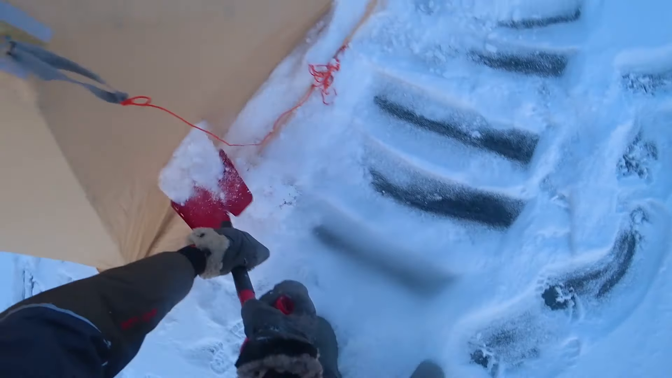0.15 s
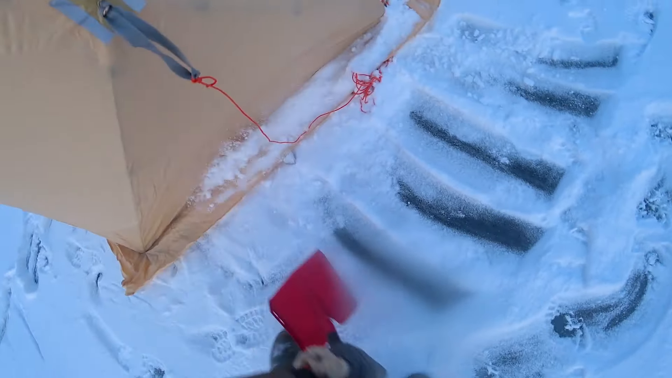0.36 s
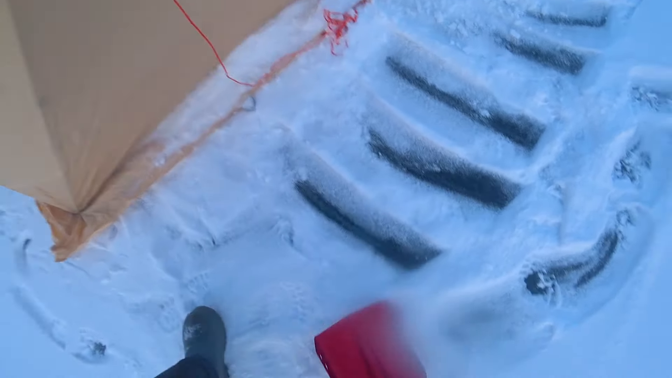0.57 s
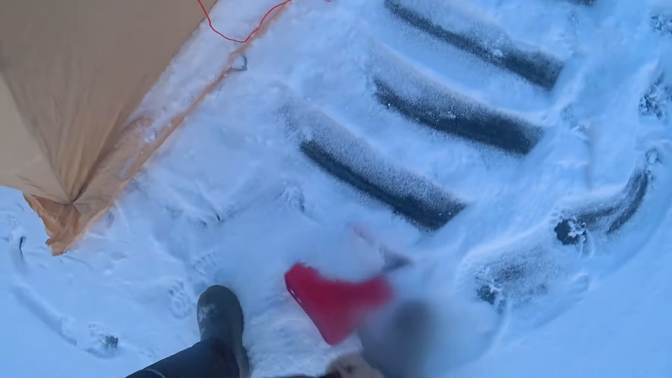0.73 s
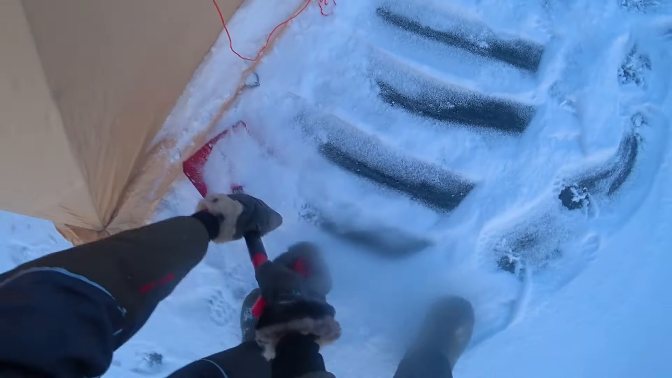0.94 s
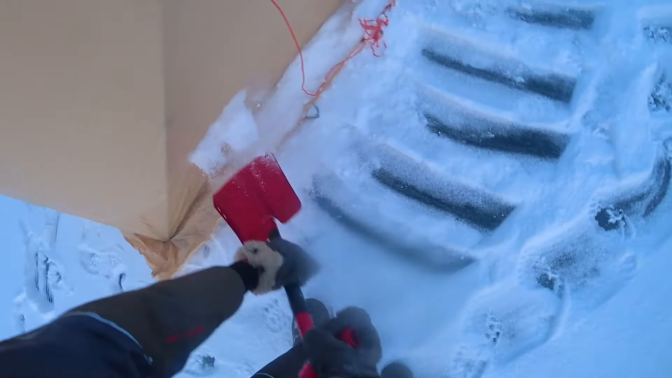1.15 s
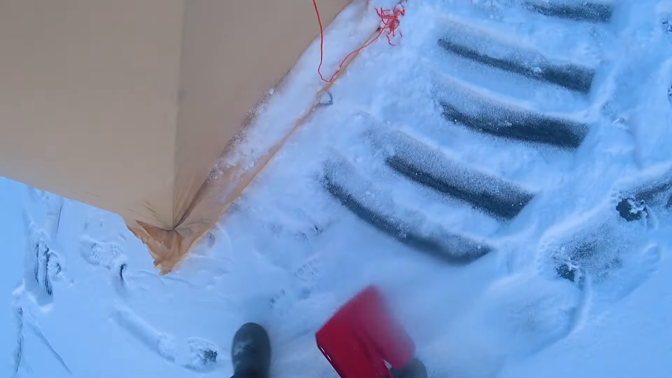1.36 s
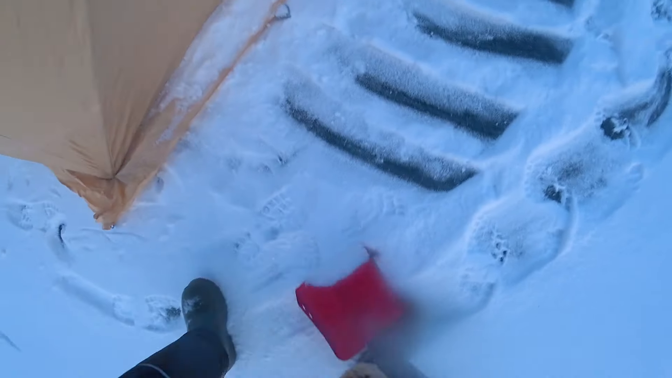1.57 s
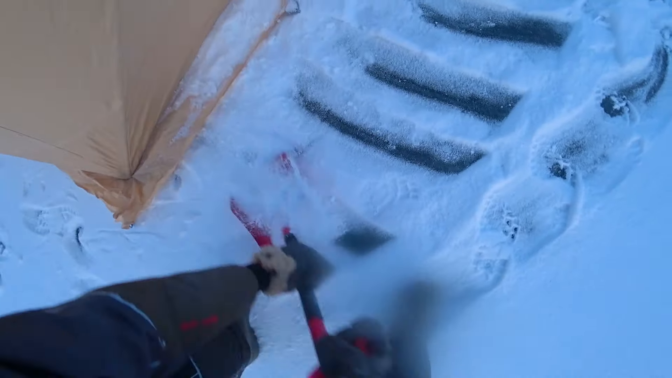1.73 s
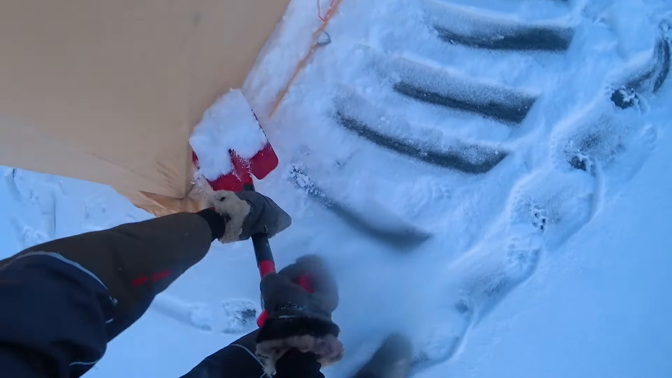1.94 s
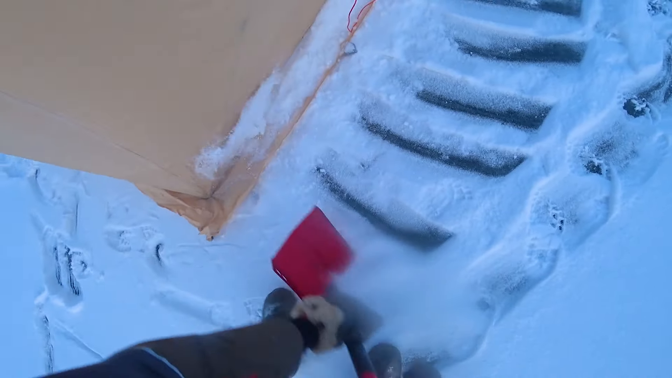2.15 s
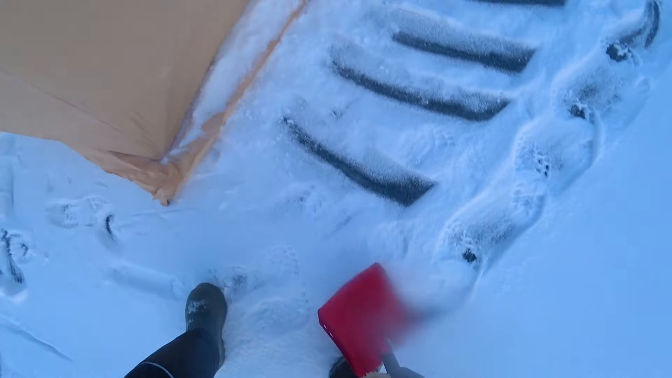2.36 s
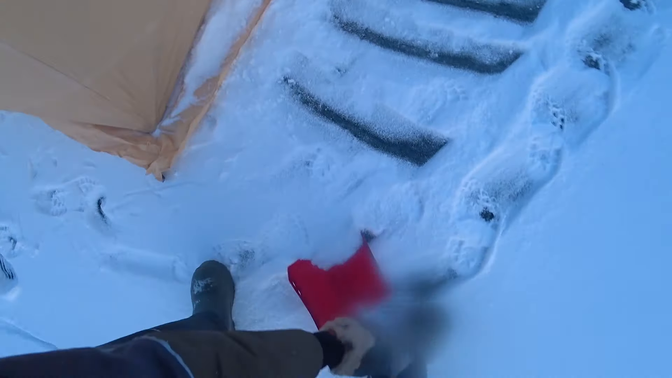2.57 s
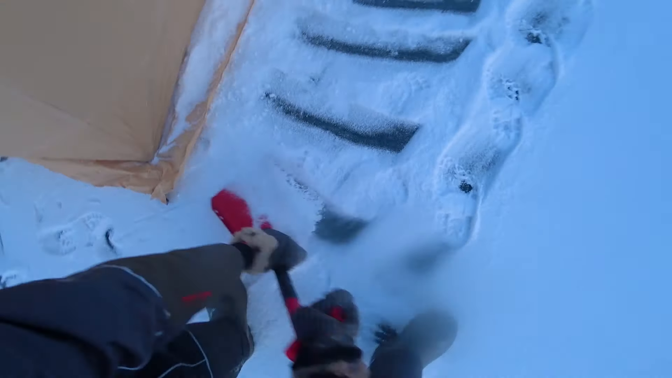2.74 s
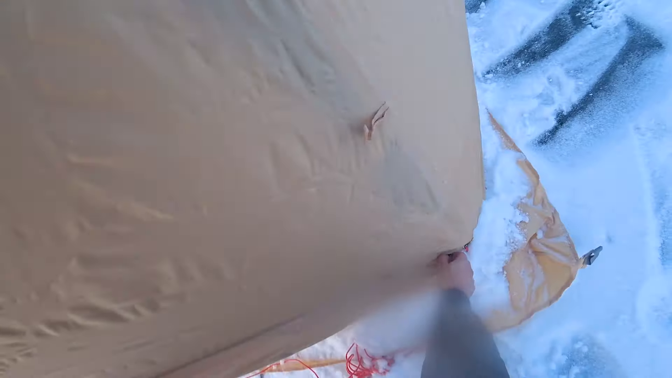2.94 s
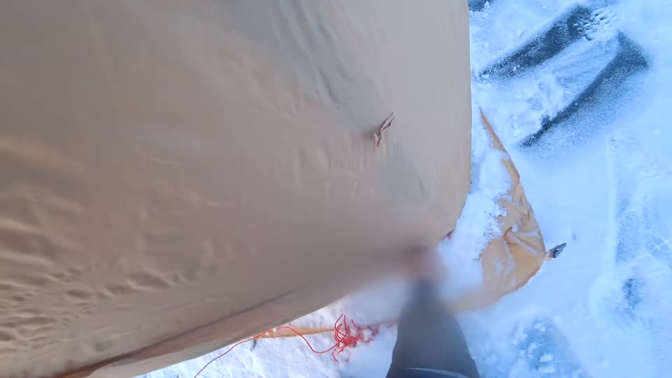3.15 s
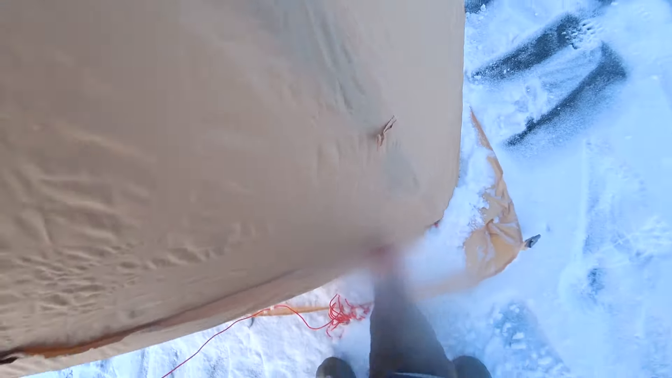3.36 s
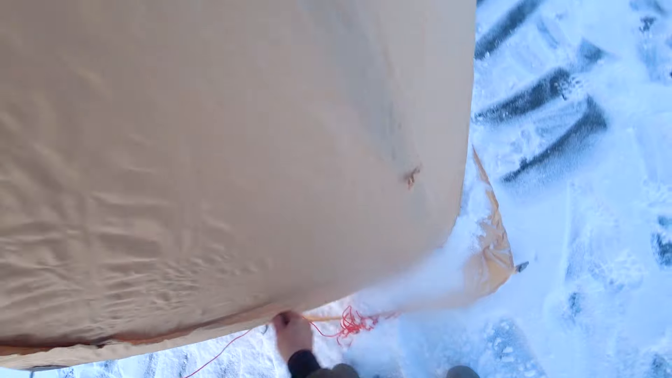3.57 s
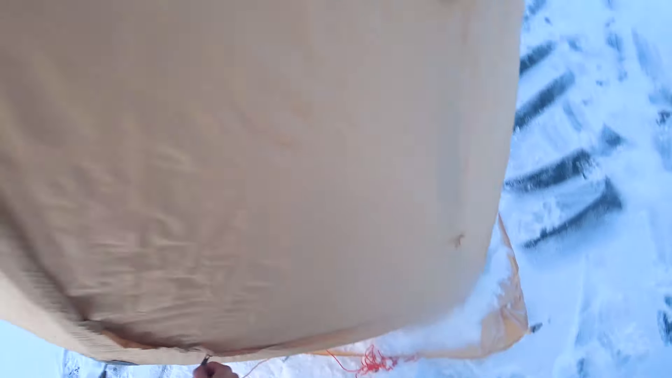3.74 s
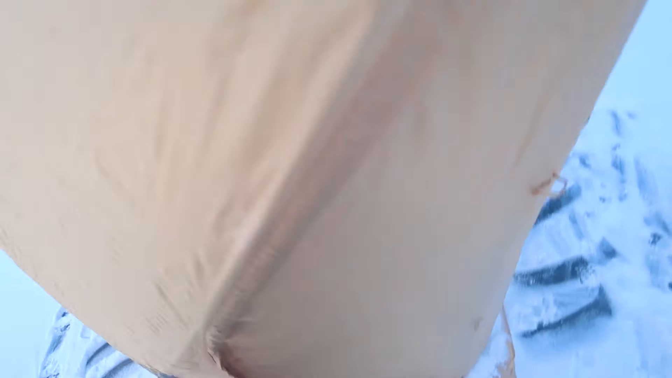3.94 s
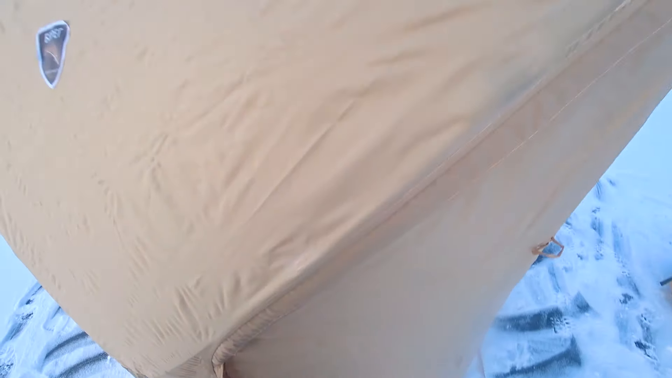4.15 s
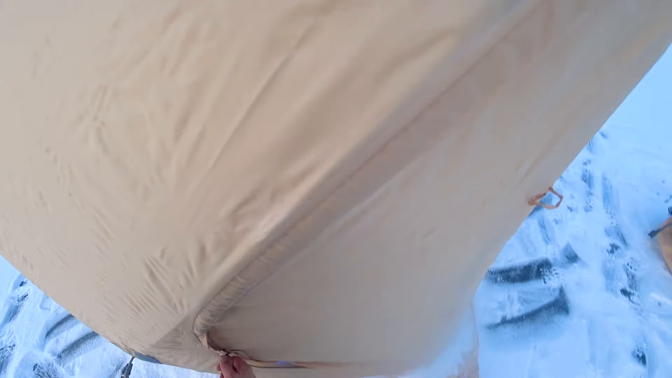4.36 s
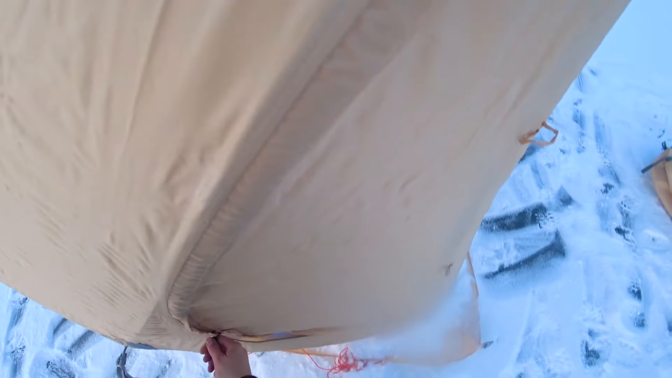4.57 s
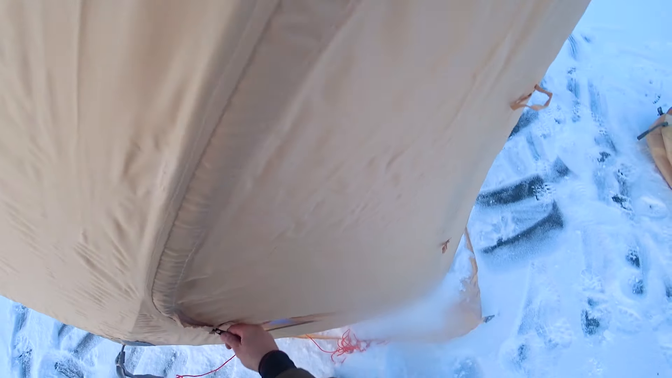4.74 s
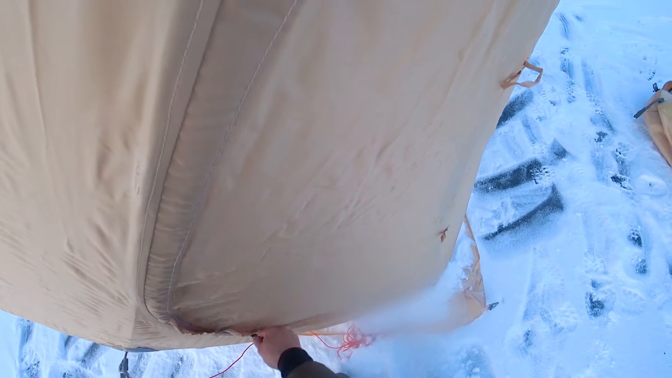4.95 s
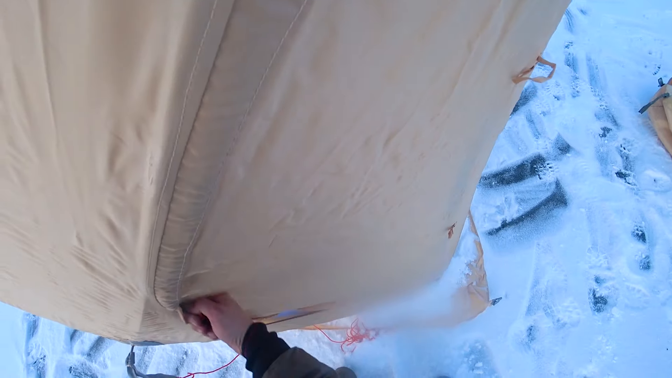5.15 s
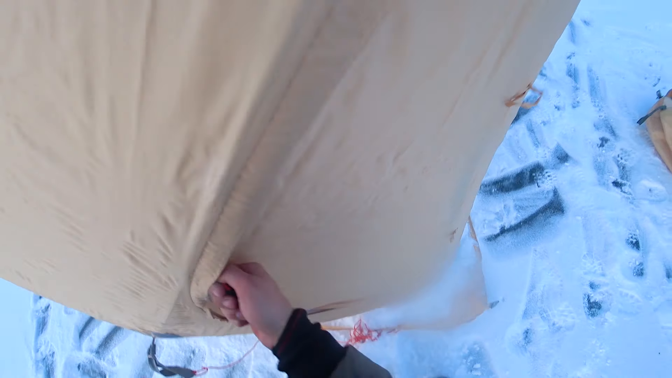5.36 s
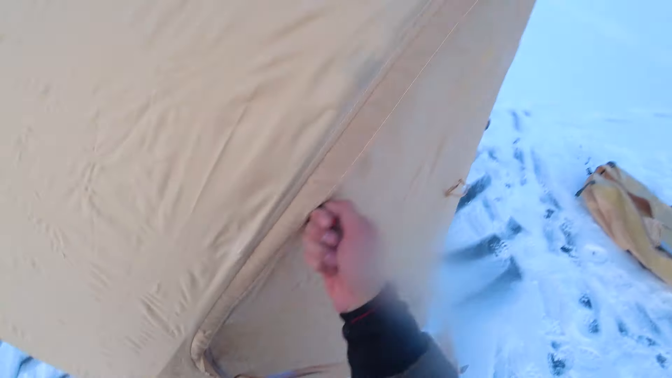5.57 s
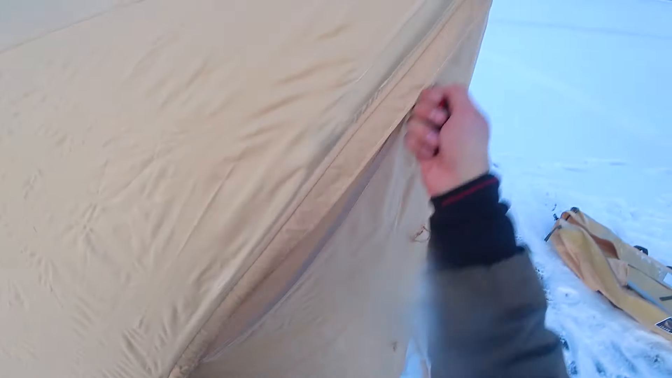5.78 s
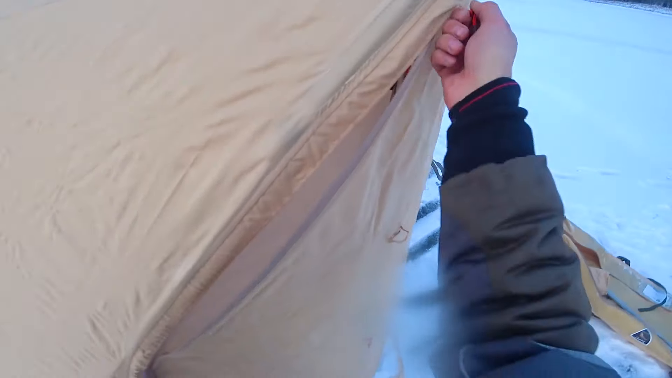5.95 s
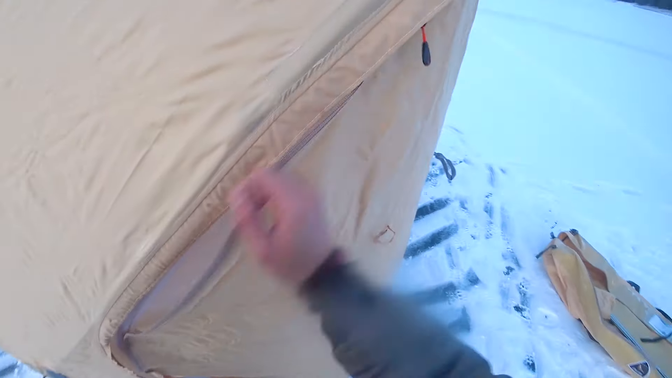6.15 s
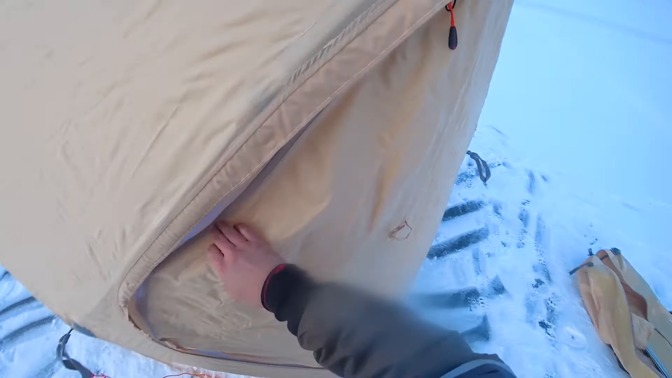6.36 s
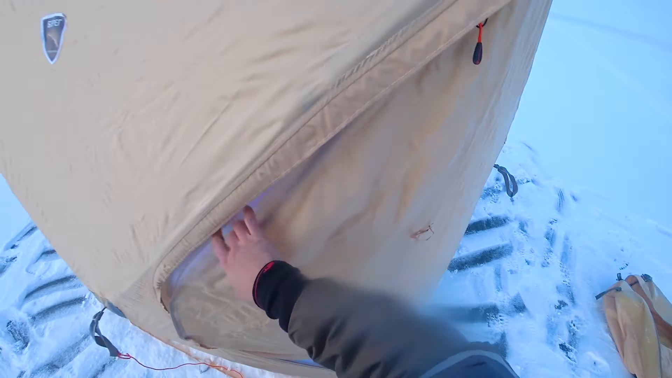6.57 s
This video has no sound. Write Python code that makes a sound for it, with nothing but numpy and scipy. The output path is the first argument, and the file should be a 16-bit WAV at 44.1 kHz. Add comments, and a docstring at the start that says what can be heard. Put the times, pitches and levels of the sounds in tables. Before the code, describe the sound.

Close, dry outdoor stereo sound with light, low wind buffeting the microphone. At 0 s the loud end of a shovel push cuts off, followed by cloth rustle and snow crunch. Grainy, hissing scrapes with a ringing blade come at about 0.7-1.0, 1.55-1.85 and 2.45-2.85 s, with dull knocks around them and a hard crack near 2.48. From 3.15 to 3.9 s a tent zip buzzes, starting slow and rough, rising in pitch to a fast whirr, then dropping; a sharp snap lands at 3.33. Cloth clicks cluster around 4.0, then it is quieter, with faint rustling and wind thumps near 4.7. A brief zip tug at 4.85-5.0 leads to pulls at 5.05-5.4 and 5.43-6.0, with bright tab jingles and snaps. From 6.0 to 6.6 only fabric rustle, scattered small snaps and wind remain.

```python
"""Beside a tent in dry snow, a shovel ends one push and makes three more; then the tent's zip opens in four strokes.
The shovel is a stream of tiny snow-grain noises that also makes the blade ring. The zip is a buzz of jolts from
its teeth with a hiss from the slider, and its metal pull tab jingles as short fading sines. Cloth and snow rustle
as filtered noise, snaps and knocks are brief tones with a crack, and light wind is low noise at the microphone."""
import sys
import numpy as np
from scipy import signal
from scipy.fft import rfft, irfft, next_fast_len
from scipy.io import wavfile

SR = 44100
rng = np.random.default_rng(int(sys.argv[2]) if len(sys.argv) > 2 else 0)


def bounce(signal):
    """Save signal as a 16-bit WAV file at the path given by the first command-line argument."""
    frames = np.transpose(np.atleast_2d(signal))
    limited = np.clip(frames, -1, 1)
    pcm = np.round(limited * 32767).astype(np.int16)
    wavfile.write(sys.argv[1], SR, pcm)


N = 291501  # length of the scene [samples]


def from_db(db):
    """Turn decibels into a gain."""
    return 10 ** (np.asarray(db) / 20)


def rms_one(x):
    """Scale a sound to an average (rms) strength of 1."""
    return x / np.sqrt(np.mean(x ** 2) + 1e-20)


def in_time(rows):
    """Draw each column of a table as a line through time, sample by sample."""
    times, *columns = np.transpose(rows)
    return [np.interp(np.arange(N) / SR, times, column) for column in columns]


def strokes(tables):
    """Join several tables in time, with a gate that fades to silence within 15 ms outside each."""
    t = np.arange(N) / SR
    gate = 0
    for rows in tables:
        start, end = rows[0][0], rows[-1][0]
        gate = gate + np.interp(t, [start - .015, start, end, end + .015], [0, 1, 1, 0])
    return [gate] + in_time(np.vstack(tables))


def per_stroke(tables, first, last):
    """Let a value run from first to last along each table."""
    rows = []
    for table, start_value, end_value in zip(tables, first, last):
        rows += [(table[0][0], start_value), (table[-1][0], end_value)]
    return in_time(rows)[0]


def shape(x, points, kind=from_db):
    """Filter by a (frequency [Hz], value) table, read on a log frequency axis."""
    size = next_fast_len(N)
    hz = np.maximum(np.fft.rfftfreq(size, 1 / SR), 1)
    table_hz, values = np.array(points)[:, 0], np.array(points)[:, 1]
    response = kind(np.interp(np.log(hz), np.log(table_hz), values))
    return irfft(rfft(x, size) * response, size)[:N]


def band(x, low_hz, high_hz):
    """Keep one band of frequencies and scale it to rms 1."""
    sos = signal.butter(2, [low_hz, high_hz], "band", fs=SR, output="sos")
    return rms_one(signal.sosfilt(sos, x))


def drift(rate):
    """Make a random wander of rms 1; a higher rate [Hz] wanders faster."""
    r = np.exp(-2 * np.pi * rate / SR)
    noise = rng.standard_normal(N + SR)
    return rms_one(signal.lfilter([1], [1, -2 * r, r * r], noise)[SR:])  # skip the start-up second


def grains(spread_db, clump_db, clump_rate):
    """Make a dense stream of tiny breaks of uneven size, coming in clumps."""
    sizes_db = spread_db * np.minimum(rng.exponential(1, N), 6) + clump_db * drift(clump_rate)
    return rms_one(from_db(sizes_db) * rng.standard_normal(N))


def ring(clicks, hz, t60):
    """Let each click start a fading sine, 60 dB weaker after t60 seconds."""
    r, w = from_db(-60 / (t60 * SR)), 2 * np.pi * hz / SR
    return signal.lfilter([0, np.sin(w)], [1, -2 * r * np.cos(w), r * r], clicks + 1e-18)


def patchy(x, patch_db, rate, centre_hz=None, lift_db=0):
    """Let sixth-octave bands swell separately; a moving resonance may lift those near it."""
    out = 0
    edges = 150 * 2 ** np.arange(0, 7, 1 / 6)
    swells = [drift(rate) for _ in range(7)]
    for k, (low, high) in enumerate(zip(edges, edges[1:])):
        db = patch_db * np.roll(swells[k % 7], 9973 * k)  # reuse seven wanders, shifted in time
        if centre_hz is not None:
            db = db + lift_db * np.exp(-(np.log(centre_hz / low) / 0.66) ** 2)
        sos = signal.butter(2, [low, high], "band", fs=SR, output="sos")
        out = out + from_db(db) * signal.sosfilt(sos, x) * (-1) ** k
    return out


def blows(events, crack_s):
    """Let each blow ring briefly at its pitch, with a broad crack that fades 60 dB in crack_s."""
    out, t = np.zeros(N + SR), np.arange(6000) / SR
    noises = rng.standard_normal((len(events), len(t)))
    for (s, db, hz, t60, crack_db), noise in zip(events, noises):
        body = np.sin(2 * np.pi * hz * t) * from_db(-60 * t / t60)
        crack = from_db(crack_db - 60 * t / crack_s) * signal.lfilter([.35], [1, -.9, .25], noise)
        at = round(s * SR)
        out[at:at + len(t)] += from_db(db) * (body + crack)
    return out[:N]


def wind():
    """Air pressure pushes unevenly on the microphone: a deep rumble with a lighter flutter above."""
    # Wind strength before its random wander: (time [s], rumble level [dB], flutter level [dB])
    gusts = [(0.0, -57, -43), (0.09, -50, -48.5), (1.91, -63, -48), (2.87, -56, -47), (3.05, -50, -45),
             (3.33, -54, -34), (3.41, -49, -41), (3.87, -42.5, -41.5), (4.57, -45.5, -56),
             (4.66, -28.5, -52), (4.73, -44, -52), (4.82, -37, -29.5), (5.12, -42, -44), (5.19, -41, -33),
             (5.26, -44, -39), (5.39, -31, -31.5), (5.49, -45, -40.5), (5.87, -36, -33.5),
             (6.06, -43, -44.5), (6.41, -34, -39), (6.61, -46, -42)]
    rumble_db, flutter_db = in_time(gusts)
    rumble = band(band(rng.standard_normal(N), 22, 58), 18, 75)
    flutter = band(band(rng.standard_normal(N), 84, 262), 59, 380)
    return rumble * from_db(rumble_db + 1.5 * drift(4)) + flutter * from_db(flutter_db + 3.0 * drift(8))


def rustle():
    """Stiff cloth crackles brightly while snow crunches lower down, both as uneven grain noise."""
    # Cloth and snow moving, one table a pause: (time [s], crackle level [dB])
    pauses = [
        [(0.04, -25), (0.112, -37), (0.138, -27.5), (0.286, -28), (0.346, -24), (0.482, -29.5), (0.516, -21),
         (0.574, -36), (0.66, -25.5)],
        [(0.99, -32), (1.042, -33.5), (1.092, -30), (1.124, -33), (1.154, -26), (1.42, -33), (1.432, -26.5),
         (1.51, -32), (1.54, -15)],
        [(1.89, -26.5), (1.902, -34), (2.018, -33.5), (2.038, -26), (2.084, -26), (2.108, -29), (2.144, -28),
         (2.45, -31), (2.46, -24)],
        [(2.85, -32), (2.878, -31.5), (2.9, -23), (2.972, -40), (3.082, -47.5), (3.09, -35.5), (3.116, -43),
         (3.128, -37.5), (3.16, -36.5)],
        [(3.9, -30.5), (3.928, -31), (3.932, -42), (3.998, -32.5), (4.008, -27.5), (4.056, -43), (4.092, -40),
         (4.16, -48.5), (4.2, -43.5)],
        [(4.215, -46.5), (4.485, -47.5), (4.495, -34.5), (4.521, -51), (4.695, -50), (4.705, -41), (4.723, -44),
         (4.865, -32.5), (4.87, -14.5)],
        [(4.98, -29), (5.002, -41), (5.046, -35), (5.058, -38), (5.07, -27.5)],
        [(5.98, -31), (6.016, -48), (6.07, -37.5), (6.092, -44.5), (6.134, -31.5), (6.49, -37), (6.55, -49),
         (6.56, -42), (6.61, -40.5)],
    ]
    # Tone colour of the cloth: (frequency [Hz], gain [dB])
    cloth_colour = [(290, -10.5), (500, -25), (784, -7), (1210, 0), (2130, -3), (5550, -1), (11100, -12.5),
                    (15100, -18), (16000, -21)]
    # Low crunch, one value a pause: (level above the crackle [dB])
    crunch_levels = [-9, -6, -4.5, -1, -1.5, -3.5, -9, 2.5]
    gate, rustle_db = strokes(pauses)
    cloth_grains = grains(spread_db=1.5, clump_db=2.0, clump_rate=34)
    crackle = rms_one(shape(patchy(cloth_grains, patch_db=2.5, rate=15), cloth_colour))
    crunch = band(grains(spread_db=5.0, clump_db=3.5, clump_rate=33), 305, 1024)
    crunch_db = per_stroke(pauses, crunch_levels, crunch_levels)
    return gate * from_db(rustle_db) * (crackle + from_db(crunch_db) * crunch)


def snaps():
    """Frozen cloth snaps sharply, and dull knocks ring lower; each is a fading tone plus a crack."""
    # Snaps: (time [s], level [dB], pitch [Hz], crack level above the tone [dB])
    snap_events = [(0.6913, -6, 3050, -14), (1.31, -15, 4150, -3), (2.458, -14, 3240, -6),
                   (2.4779, 1, 3520, 10), (3.0902, -19.5, 4420, -1), (3.1268, -17, 4580, -6),
                   (3.2436, -18, 3150, -9), (3.3312, -2, 4330, -6), (3.95, -12.5, 4540, -2),
                   (4.007, -6, 5040, -12), (4.0164, -8, 5330, -1.5), (4.0257, -11.5, 8750, 0),
                   (4.4947, -15.5, 4300, -2), (4.706, -25.5, 3460, -4), (4.778, -27, 1570, -4),
                   (4.8246, -21, 1710, 13), (4.8712, -11.5, 1596, -13), (5.0679, -3.5, 5670, -14),
                   (5.0933, -20, 4714, -3), (5.1213, -7.5, 4796, -8), (5.3532, -5, 2700, -8),
                   (5.4325, -9, 3040, 5), (5.464, -9, 2750, 7), (5.742, -3, 2500, -10),
                   (5.796, -2, 6290, -4), (5.8083, -7, 4520, 14), (5.9184, -10, 1670, 7),
                   (6.064, -16, 8700, 0), (6.1384, -9.5, 3600, 3), (6.1522, -6, 3580, 1),
                   (6.1853, -14, 2610, 11), (6.209, -18, 1940, 3), (6.2317, -13, 4080, -8),
                   (6.29, -18, 3870, 1), (6.333, -8, 4610, 3), (6.3427, -9.5, 4630, -22),
                   (6.3966, -14.5, 3470, 7.5), (6.4184, -10, 3300, 2), (6.562, -22, 1920, -12)]
    # Dull knocks: (time [s], level [dB], pitch [Hz], time to fade by 60 dB [s])
    knock_events = [(0.641, -15, 703, .11), (0.689, -15, 472, 0.16), (1.085, -25, 377, 0.046),
                    (1.201, -22.5, 690, 0.049), (1.513, -24, 396, .06), (1.592, -10.5, 493, 0.096),
                    (1.912, -23, 428, 0.036), (2.361, -26, 396, .05), (2.398, -21.5, 369, .06),
                    (2.898, -18.5, 719, .09), (3.039, -20.5, 444, 0.025), (3.091, -19, 432, 0.033),
                    (3.127, -25, 715, .03), (4.097, -15, 493, 0.018), (4.777, -27.5, 703, .045),
                    (4.827, -19, 471, 0.056)]
    # A snap fades by 60 dB in 15 cycles of its pitch
    sharp = blows([(s, db, hz, 15 / hz, crack_db) for s, db, hz, crack_db in snap_events], crack_s=.006)
    dull = blows([row + (-32,) for row in knock_events], crack_s=.012)  # crack 32 dB below the tone
    return signal.sosfilt(signal.butter(2, 150, "high", fs=SR, output="sos"), sharp + dull)


def shovel():
    """Snow grains hiss along the blade and keep its natural tones ringing, each in fits."""
    # Pushes: (start [s], length [s], scrape level [dB], drop by the end [dB], ring above the scrape [dB])
    pushes = [(-0.3, 0.31, -5, 8, -17.5), (0.675, 0.31, -12.5, 3, -11.5), (1.523, 0.027, -24.5, -2, -27),
              (1.568, 0.285, -13.5, 1.5, -15.5), (2.461, 0.367, -14, -0.6, -12.5)]
    # Tone colour of the snow: (frequency [Hz], gain [dB])
    snow_colour = [(120, -95), (200, -28.5), (482, -8.5), (601, -11), (709, -5), (950, -11), (1560, -6),
                   (2090, -17.5), (2330, -8), (5420, -8), (16000, -26.5)]
    # Natural tones of the blade: (frequency [Hz], width [Hz], relative level before its wander [dB])
    blade_tones = [(333, 36, -36), (520, 13, -47), (691, 14, 22), (1080, 43, -30), (1246, 32, 21.5),
                   (1582, 43, 25), (2410, 59, -1), (3060, 37, -50), (4220, 140, 7), (4870, 44, -47),
                   (5100, 70, -29), (7100, 79, -19)]
    # Moments when the blade sticks: (time [s], dip [dB])
    stalls = [(2.507, 9), (2.593, 9.5)]
    attack_s, release_s, edge_db = 0.026, 0.02, -13  # swells from, and falls to, this far below its level
    freed_s, freed_db = 0.029, 11.5  # the ring rises as the blade lifts free of the snow
    stall_s = 0.005

    tables = []
    for s, length_s, db, sag_db, held_db in pushes:
        freed_ring_db = held_db + freed_db
        tables.append([
            (s, db + edge_db, held_db),
            (s + attack_s, db, held_db),
            (s + max(length_s - freed_s, attack_s), db - sag_db / 2, held_db),
            (s + length_s, db - sag_db, freed_ring_db),
            (s + length_s + release_s, db - sag_db + edge_db, freed_ring_db)])
    gate, scrape_db, ring_db = strokes(tables)
    t = np.arange(N) / SR
    for s, dip_db in stalls:
        scrape_db = scrape_db - dip_db * np.exp(-((t - s) / stall_s) ** 2)

    snow = grains(spread_db=3.0, clump_db=-0.5, clump_rate=66)
    blade = 0
    for hz, width_hz, db in blade_tones:
        tone = rms_one(ring(snow, hz, 2.2 / width_hz))  # a narrow tone rings longer
        blade = blade + from_db(db + 4 * drift(10)) * tone
    hiss = rms_one(shape(patchy(snow, patch_db=3.5, rate=12), snow_colour))
    return gate * from_db(scrape_db) * (hiss + from_db(ring_db) * rms_one(blade))


def pull_tab():
    """Each touch of the metal tab on the slider strikes all its tones, each by a random amount."""
    # Touches: (time [s], strike level [dB])
    touches = [(3.1657, -34), (3.255, -36), (3.4306, -25), (3.88, -44), (3.92, -46), (4.0068, -36),
               (4.1829, -43), (4.8479, -19.5), (4.9666, -21), (5.1202, -22), (5.1881, -25), (5.219, -27),
               (5.6939, -24), (5.8077, -24), (5.8401, -26), (5.9179, -26), (6.066, -30)]
    # Natural tones of the tab: (frequency [Hz], level added to the strike [dB], time to fade by 60 dB [s])
    tab_tones = [(8650, -4.5, 0.051), (10600, -9, 0.12), (11900, -12, 0.065), (14400, -7, 0.091)]
    at, out = [round(s * SR) for s, db in touches], np.zeros(N)
    strike_db = np.array(touches)[:, 1]
    luck = rng.standard_normal((len(at), len(tab_tones)))
    for k, (hz, level_db, t60) in enumerate(tab_tones):
        clicks = np.zeros(N)
        clicks[at] = from_db(strike_db + level_db + 2.2 * luck[:, k])
        out += ring(clicks, hz, t60)
    return out


def zip_pull():
    """One jolt a tooth makes a buzzing tone, hiss swells on every tooth, and the taut tape lifts one region."""
    # Strokes, one table each: (time [s], teeth per second [1/s], lowest tone level [dB], hiss level [dB])
    pulls = [
        [(3.14, 241.1, -58, -36), (3.198, 225.1, -33, -29.5), (3.282, 147.0, -39, -33),
         (3.338, 225.2, -30.5, -30.5), (3.42, 346.0, -21.5, -27.5), (3.458, 525, -31, -25.5),
         (3.568, 740, -18, -24.5), (3.584, 815, -25, -19.5), (3.642, 814, -28, -23.5), (3.672, 830.7, -21, -19),
         (3.72, 889.1, -21.5, -19.5), (3.766, 884, -22, -17), (3.888, 523, -32.5, -27), (3.93, 365.1, -53, -49)],
        [(4.85, 416, -51, -46), (4.888, 507, -35, -25), (4.926, 602.4, -12, -19.5), (4.94, 660, -40, -22.5),
         (4.966, 423, -30, -26.5), (4.99, 356, -34.5, -43)],
        [(5.06, 336, -46, -38), (5.106, 360, -32, -27), (5.14, 525, -22.5, -26), (5.156, 530, -18, -22.5),
         (5.164, 570, -25, -21.5), (5.2, 938.0, -29.5, -20), (5.292, 603, -16.5, -17), (5.328, 560, -26, -16.5),
         (5.38, 280.7, -31, -24), (5.41, 247.9, -42, -25)],
        [(5.43, 510, -36, -32), (5.46, 516.9, -32, -18.5), (5.518, 600, -28, -22), (5.606, 565, -21.5, -18.5),
         (5.67, 630, -23.5, -22.5), (5.694, 640, -33, -20.5), (5.788, 543, -16.5, -26),
         (5.812, 560, -31, -22.5), (5.834, 580, -15.5, -21.5), (5.9, 480, -21, -23), (5.918, 410, -28, -23.5),
         (5.99, 278.6, -38.5, -36.5)],
    ]
    # Tones of the buzz: (multiple of the tooth rate [x], level offset [dB])
    tooth_tones = [(1, 0), (2, -3), (3, -8), (4, -9), (5, -11), (6, -12), (7, -15), (8, -18)]
    # Tone colour of the slider: (frequency [Hz], gain [dB])
    slider_colour = [(88, -42), (150, -31), (475, -2.5), (790, -17.5), (1310, -9), (1720, -6), (2060, -2),
                     (3550, -4), (10600, -9), (14800, -17.5), (16000, 0)]
    # How each stroke holds the tape: (resonance at start [Hz], at end [Hz], overtones above hiss [dB],
    # low rasp above hiss at start [dB], at end [dB])
    grips = [(3700, 4000, -4, -1, -12), (4600, 5400, -4.5, -12, -9), (5000, 4200, -8.5, -6, -12),
             (3160, 4360, -6, -5.5, 1.5)]
    # Unevenness of the tooth rate at the reference speed: (at start [share, 0-1], at end [share, 0-1])
    scatter_ends = [(.018, .034), (.04, .05), (.03, .018), (.035, .09)]
    smooth_per_s, scatter_power = 550, 1.8  # reference speed [teeth/s]; faster pulls are more even
    # Over this last share of a stroke the teeth scatter more and the overtones fade
    fray_share, fray_scatter, fray_loss_db = .2, .16, 12

    gate, per_s, tone_db, hiss_db = strokes(pulls)
    start_hz, end_hz, over, rasp_start, rasp_end = np.transpose(grips)
    tape_hz = per_stroke(pulls, start_hz, end_hz)
    over_db = per_stroke(pulls, over, over)
    rasp_db = per_stroke(pulls, rasp_start, rasp_end)
    scatter = per_stroke(pulls, *np.transpose(scatter_ends))
    fray_rows = []
    for rows in pulls:
        start, end = rows[0][0], rows[-1][0]
        fray_rows += [(start, 0), (end - fray_share * (end - start), 0), (end, 1)]
    fray, = in_time(fray_rows)

    speed_scatter = scatter * (smooth_per_s / per_s) ** scatter_power
    uneven = np.minimum(fray_scatter * fray + speed_scatter, .16)
    turn = 2 * np.pi * np.cumsum(per_s * (1 + uneven * drift(100))) / SR  # one full turn a tooth
    buzz = 0
    for k, db in tooth_tones:
        lift_db = 4 * np.exp(-(np.log(k * per_s / tape_hz) / .45) ** 2)
        base_db = tone_db if k == 1 else hiss_db + over_db - fray_loss_db * np.sqrt(fray)
        wander_db = min(k + .5, 2.5) * 2 * drift(30)  # the fabric takes up each tone unevenly
        buzz = buzz + from_db(db + lift_db + base_db + wander_db) * np.sqrt(2) * np.cos(k * turn)

    rub = grains(spread_db=2.5, clump_db=1.5, clump_rate=60) * (1 + .9 * np.cos(turn))
    rasp = band(grains(spread_db=4.0, clump_db=3.5, clump_rate=75), 298, 1210)  # the tent wall drums along
    lifted_rub = patchy(rub, patch_db=2.0, rate=74, centre_hz=tape_hz, lift_db=11.5)
    hiss = rms_one(shape(lifted_rub, slider_colour))
    return gate * (buzz + from_db(hiss_db) * (hiss + from_db(rasp_db) * rasp))


def scene():
    """Both microphone ports hear everything; a restless share reaches them with opposite sign."""
    # The share that differs between the ports: (frequency [Hz], level before its wander [dB])
    unlike = [(60, -15), (200, -26), (700, -30), (2000, -15), (8000, -10), (15000, -14)]
    near = wind() + rustle() + snaps() + shovel() + pull_tab() + zip_pull()
    apart = shape(near, unlike) * drift(100)
    return np.array([near + apart, near - apart])


def record(dry):
    """The two ports differ in phase and level; peaks are rounded and the top is cut."""
    # Timing between the ports: (frequency [Hz], phase by which left leads [rad])
    lead = [(60, .1), (350, .7), (900, .8), (2000, .5), (4000, .55), (8000, .45), (12000, .15), (16000, 0)]
    # Balance between the ports: (frequency [Hz], left minus right level [dB])
    lean = [(60, 0), (200, .3), (700, 1.7), (1300, 1.5), (2400, .5), (4400, 1), (8000, 1.5), (15000, .8)]
    # Each port takes half of the difference
    left = shape(shape(dry[0], lead, lambda p: np.exp(.5j * p)), lean, lambda db: from_db(db / 2))
    right = shape(shape(dry[1], lead, lambda p: np.exp(-.5j * p)), lean, lambda db: from_db(-db / 2))
    top_cut = signal.cheby2(14, 70, 16350, fs=SR, output="sos")  # 70 dB down from 16350 Hz upwards
    return signal.sosfilt(top_cut, np.tanh([left, right]))


dry = scene()
out = record(dry)
bounce(out)
```